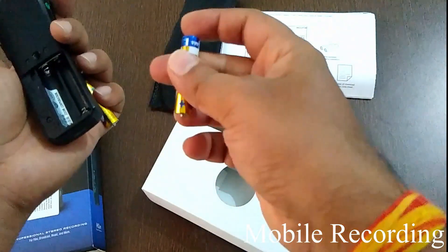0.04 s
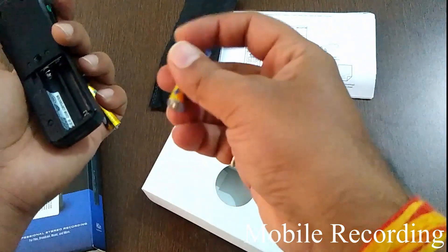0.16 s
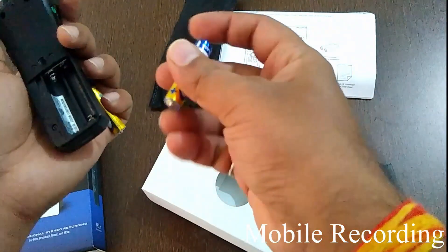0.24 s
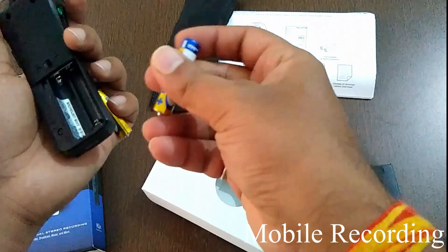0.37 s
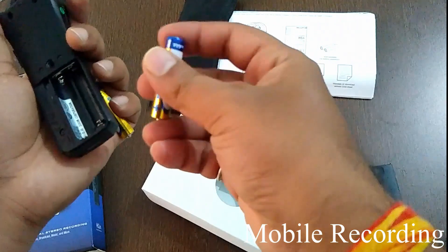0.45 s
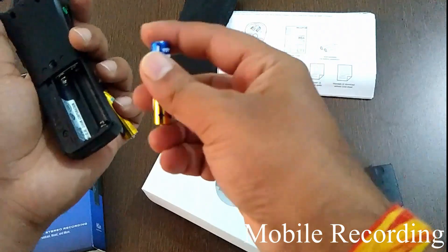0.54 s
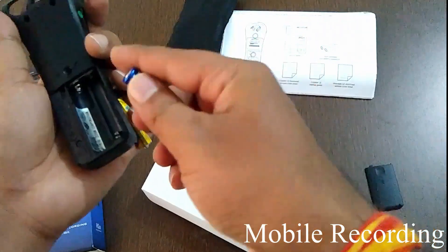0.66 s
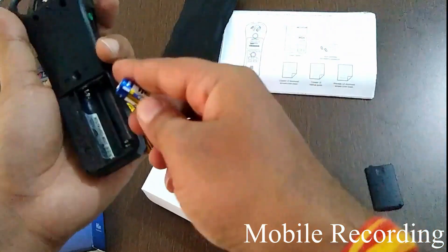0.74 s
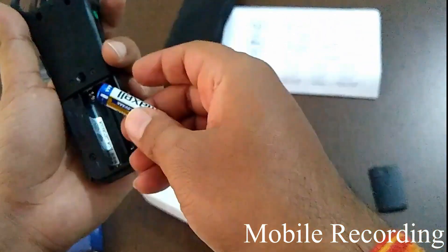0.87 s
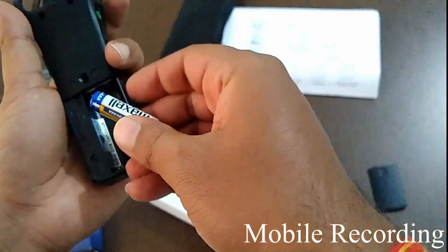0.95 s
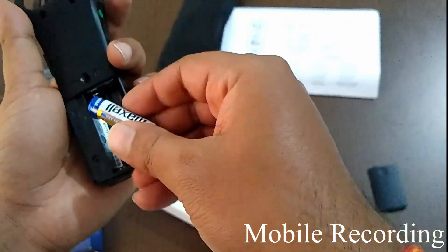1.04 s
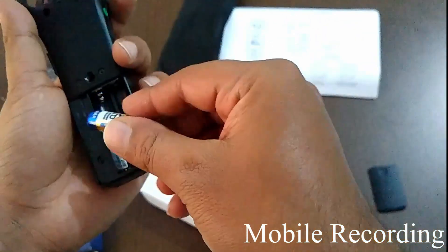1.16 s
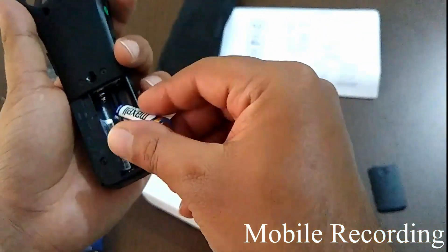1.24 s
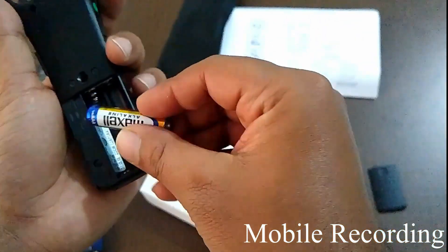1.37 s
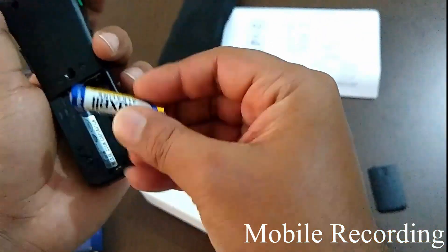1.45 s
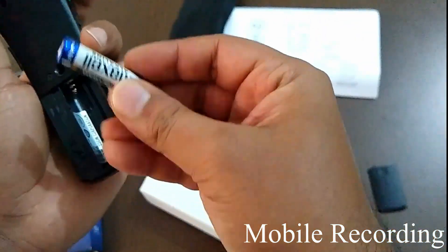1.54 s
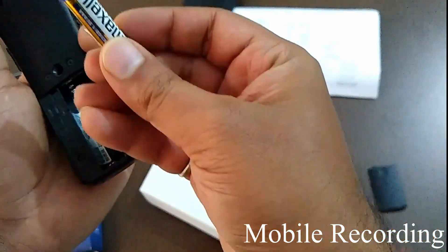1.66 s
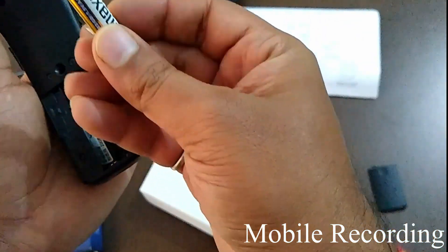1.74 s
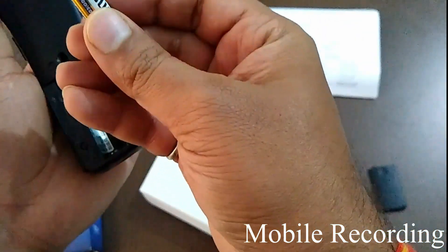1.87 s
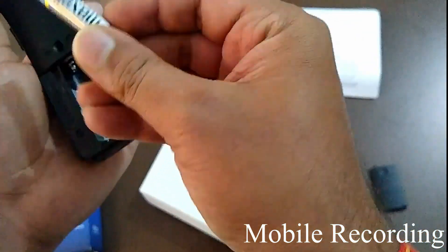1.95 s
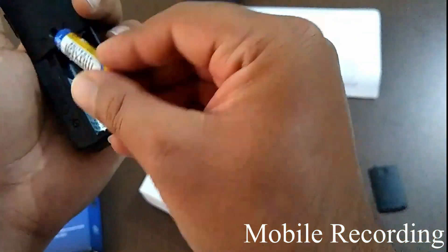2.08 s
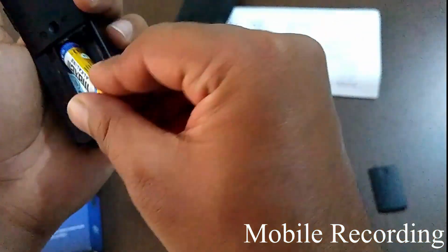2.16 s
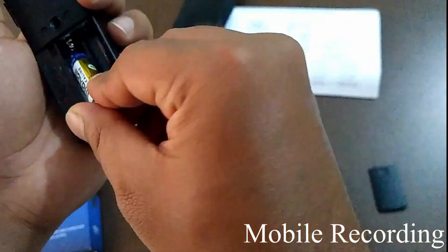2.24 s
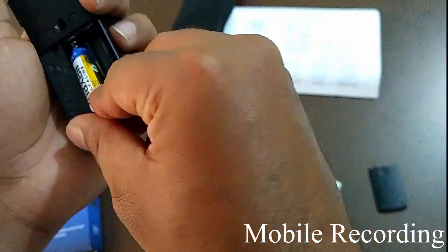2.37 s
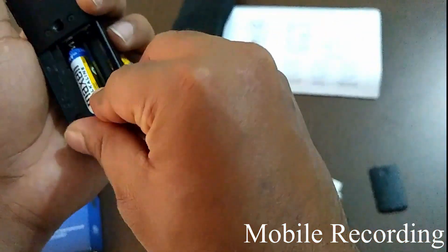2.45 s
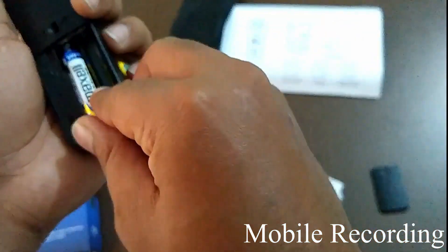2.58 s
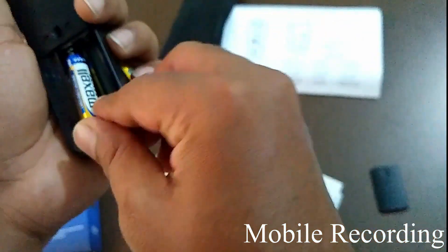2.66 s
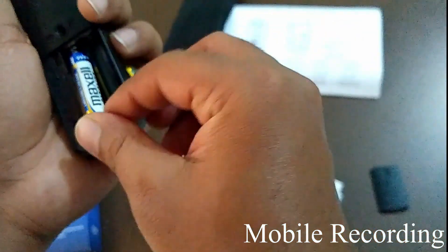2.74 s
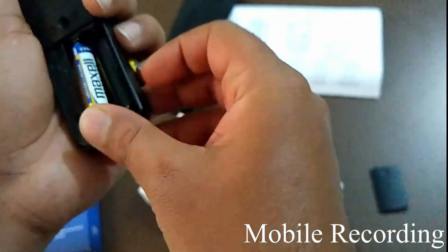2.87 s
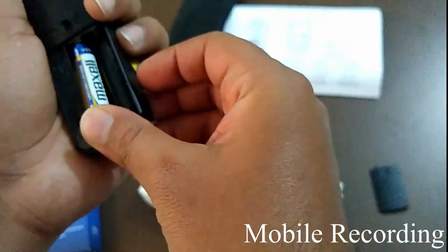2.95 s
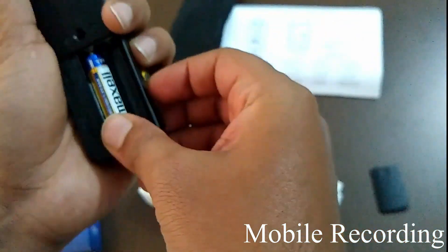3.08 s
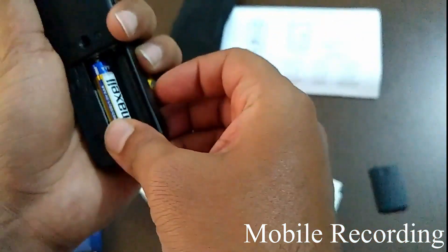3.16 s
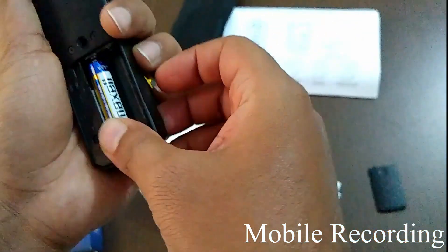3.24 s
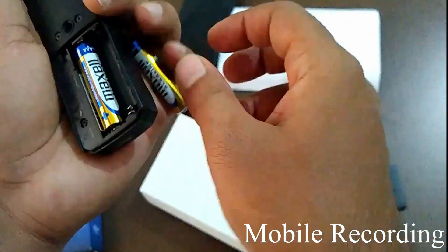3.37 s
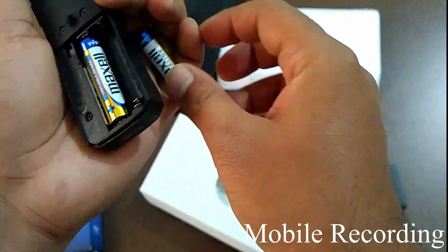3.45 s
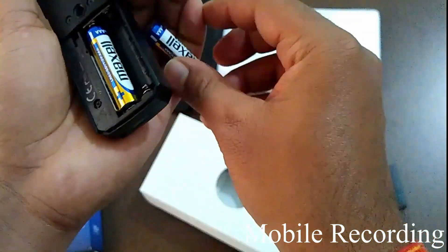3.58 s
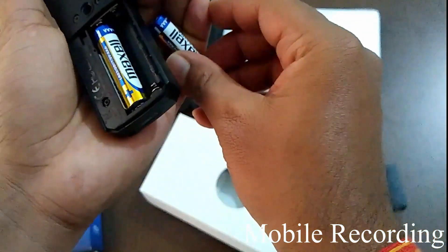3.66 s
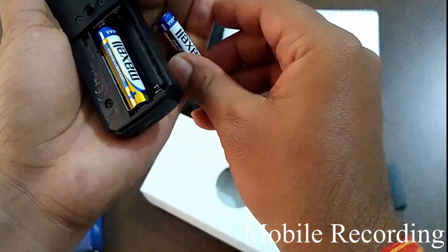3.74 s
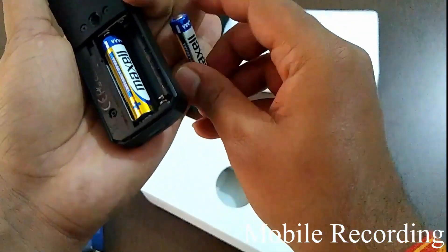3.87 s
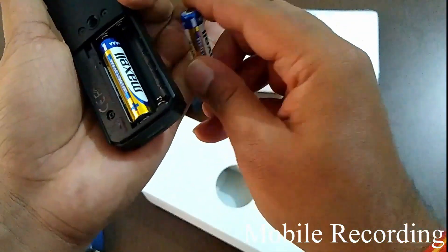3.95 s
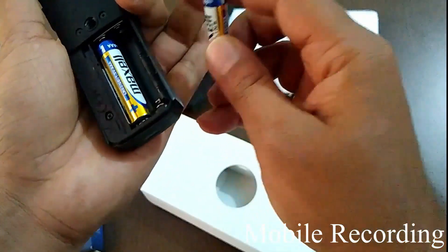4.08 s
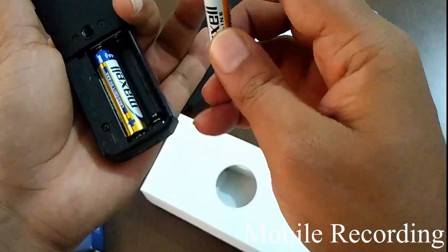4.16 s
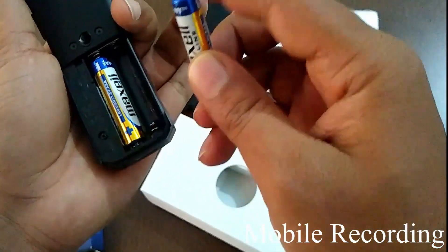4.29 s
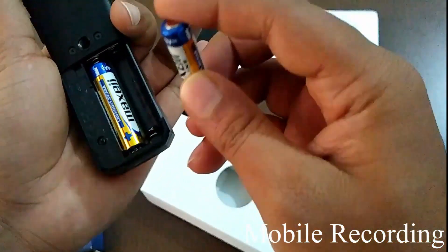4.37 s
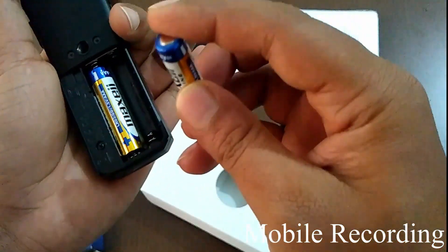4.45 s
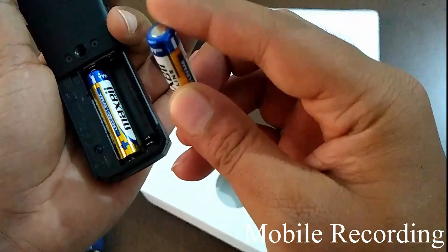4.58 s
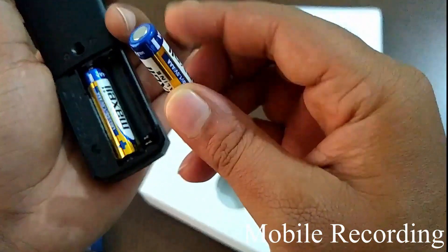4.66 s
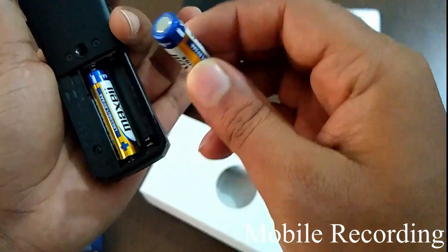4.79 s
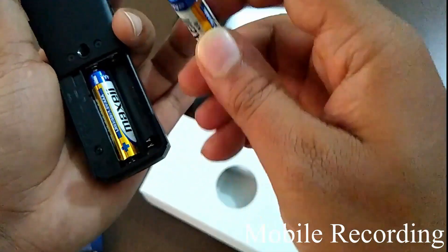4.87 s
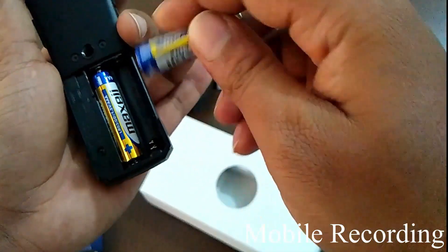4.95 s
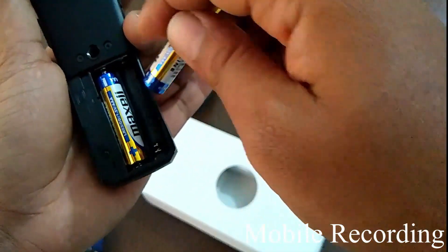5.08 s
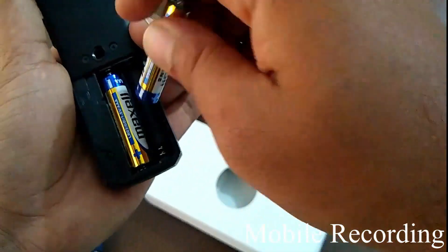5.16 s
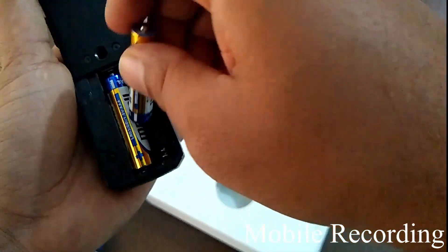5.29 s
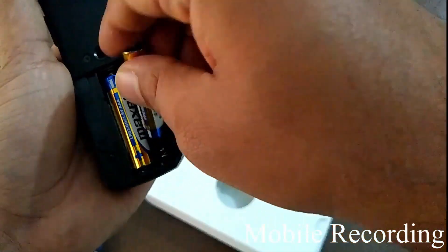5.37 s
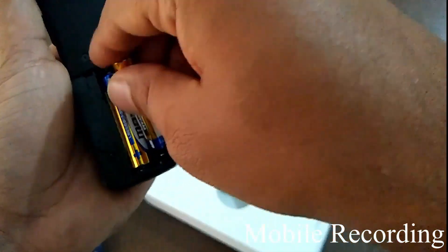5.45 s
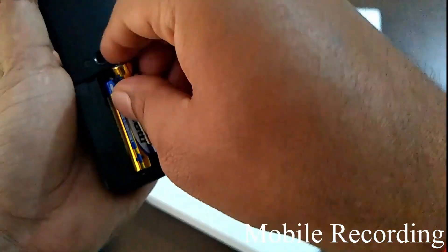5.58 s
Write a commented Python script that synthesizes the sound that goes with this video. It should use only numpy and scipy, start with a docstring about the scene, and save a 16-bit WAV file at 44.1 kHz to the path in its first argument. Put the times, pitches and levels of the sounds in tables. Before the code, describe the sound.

A fan runs throughout in a bare room, a quiet low rush and hum with faint hiss, slowly rising and falling a little. Close by, a small battery is fitted into the plastic compartment of a hand-held device. A very faint tick and scrape come at about 0.8 seconds. The battery taps the rim sharply at 1.3 seconds and again, louder, at 2.3, each time with a tiny bounce. Lighter ticks and soft scrapes along the spring follow from 2.4 to 2.8. At 2.9 it snaps home with the loudest click, followed by a quick rattle of clicks around 3.0 and a faint tick at 3.3. Then there is little but the fan until 5.3 to 5.5 seconds, when a second battery knocks against the compartment with a few softer clicks and a short scrape. The clicks are brief, bright and plastic, each leaving a slight room echo.

```python
"""A bare room, with the steady rush and hum of a fan; the background level slowly rises and falls.
Close by, small batteries go into the plastic bay of a hand-held device: one cell taps the rim,
scrapes along the spring and snaps home, then a second is set against the bay.
Every knock and scrape rings the modes of the plastic shell, and the room rings after it."""
import sys
import numpy as np
from scipy import signal
from scipy.fft import rfft, irfft
from scipy.io import wavfile

SR = 44100
rng = np.random.default_rng(int(sys.argv[2]) if len(sys.argv) > 2 else 0)


def wav_record(signal):
    """Record a signal, one row per channel, as 16-bit PCM in the file named by sys.argv[1]."""
    frames = np.transpose(np.atleast_2d(signal))
    bounded = np.clip(frames, -1, 1)
    # unit amplitude maps onto the largest positive 16-bit level
    quanta = np.round(bounded * 32767).astype(np.int16)
    wavfile.write(sys.argv[1], SR, quanta)


N = 247842


def gain_of(db):
    """Decibels to amplitude."""
    return 10 ** (np.asarray(db) / 20)


def unit_rms(x):
    """Scales to rms 1."""
    return x / np.sqrt(np.mean(x ** 2) + 1e-20)


def eq_gain(points, hz):
    """Gain of an EQ curve drawn in dB on a log-frequency axis."""
    point_hz, db = np.transpose(points)
    return gain_of(np.interp(np.log(hz + 1), np.log(point_hz + 1), db))


def automation(points):
    """Straight ramps between timed points, one value a sample."""
    return np.interp(np.arange(N) / SR, *np.transpose(points))


def add(mix, start_s, sound):
    """Mixes a sound in at its start time."""
    part = mix[round(start_s * SR):][:len(sound)]
    part += sound[:len(part)]


def noise(spectrum):
    """Steady noise of the given colour, rms 1."""
    white = rfft(rng.standard_normal(N))
    return unit_rms(irfft(white * eq_gain(spectrum, np.fft.rfftfreq(N, 1 / SR)), N))


def background_swell(level_db, share):
    """Gain around level_db that follows a share of the slow rise and fall of the background level."""
    # background level, taken relative to its mean: time_s, level_db
    swell = [(0.0, -49.5), (0.72, -49.5), (0.94, -48.5), (1.34, -48), (1.6, -45.5), (2.05, -46),
             (2.35, -48.5), (2.6, -48), (3.01, -45), (4.43, -45), (4.59, -46), (5.34, -49.5), (5.62, -44)]
    swell_db = automation(swell)
    return gain_of(level_db + share * (swell_db - swell_db.mean()))


def fan_rush(split_hz=600):
    """Moving air: a low rush with a faint hiss above it, both riding the background level."""
    # colour of the rushing air: frequency_hz, relative_db
    rush_spectrum = [(20, -54), (60, -20), (95, -18), (125, -8.5), (190, -3), (310, -0.5), (345, 1),
                     (420, 0.5), (480, -0.5), (720, -9), (1050, -5), (1500, -14), (2200, -32.5),
                     (3000, -70)]
    # colour of the hiss: frequency_hz, relative_db
    hiss_spectrum = [(1200, -7.5), (2300, -5), (2800, 3.5), (3600, -1.5), (4500, -16.5), (5200, -9.5),
                     (5900, -12.5), (6800, -23), (7700, -18), (8900, -25), (10000, -21), (15400, -25.5),
                     (16000, -33)]
    air = noise(rush_spectrum)
    body = signal.sosfiltfilt(signal.butter(4, split_hz, fs=SR, output="sos"), air)
    return (background_swell(level_db=-49, share=1.11) * unit_rms(body)
            + background_swell(level_db=-51, share=0.97) * unit_rms(air - body)
            + background_swell(level_db=-66, share=0.75) * noise(hiss_spectrum))


def fan_hum(waver_hz=3, waver_depth=0.92):
    """Low fan tones that waver in level and phase and ride the background level."""
    # tones of the fan: pitch_hz, level_db
    tones = [(121.4, -63.5), (182.4, -61.5), (201.3, -59.5), (243, -60), (399, -61.5), (427, -56.5),
             (444, -70)]
    t = np.arange(N) / SR
    slow_band = np.exp(-(np.fft.fftfreq(N, 1 / SR) / waver_hz) ** 2)
    out = np.zeros(N)
    for pitch_hz, level_db in tones:
        jitter = rng.standard_normal(N) + 1j * rng.standard_normal(N)
        drift = np.fft.ifft(np.fft.fft(jitter) * slow_band)
        carrier = np.exp(2j * np.pi * (pitch_hz * t + rng.random()))
        tone = ((1 + waver_depth * drift / drift.std()) * carrier).real
        out += background_swell(level_db, share=0.68) * unit_rms(tone)
    return out


def shell_ring(place, bass_db, treble_db, pitch, ring, pivot_hz=3200, spread_db=1.46, samples=1400):
    """One blow on the shell, peak 1: broad contacts stir the low modes, sharp edges the high ones."""
    # modes of the plastic shell with a cell in it: pitch_hz, floor_hit_db, rim_hit_db, t60_s
    shell_modes = [(846, -8, -22, 0.011), (1440, -0.5, -11.5, 0.006), (1673, -3, -3, 0.014),
                   (2027, -15, -5, 0.012), (2957, -0.5, 2, 0.0046), (3440, 2, 6, 0.0061),
                   (3800, -4, -2.5, 0.004), (5204, -17.5, -16.5, 0.0082), (5984, -23, -15.5, 0.0081),
                   (7600, -26, -18.5, 0.0041), (9180, -29, -38, 0.0039), (10980, -34.5, -22, 0.0029),
                   (13800, -35, -35, .003)]
    build_s, chatter_s, low_cut_hz = 0.00027, 0.0034, 620
    hz, floor_db, rim_db, t60_s = np.transpose(shell_modes)[:, :, None]
    t = np.arange(samples) / SR
    # place runs from 0 on the bay's floor to 1 on its rim
    mode_db = floor_db + place * (rim_db - floor_db) + spread_db * rng.standard_normal(hz.shape)
    # tilts are per octave from the pivot; the bass tilt levels off one octave down
    octaves = np.log2(hz / pivot_hz)
    mode_db += bass_db * np.clip(-octaves, 0, 1) + treble_db * np.maximum(octaves, 0)
    # the modes build up as the blow spreads through the shell; neighbours move in opposite senses
    envelope = (1 - np.exp(-t / build_s)) * np.exp(-np.log(1000) * t / (t60_s * ring))
    polarity = (-1) ** np.arange(len(hz))[:, None]
    modes = (polarity * gain_of(mode_db) * envelope * np.sin(2 * np.pi * pitch * hz * t)).sum(0)
    # the contact chatters for a moment after the first touch
    force = 0.0455 * rng.standard_normal(samples) * np.exp(-t / chatter_s)
    force[0] = 1
    sound = signal.fftconvolve(modes, force)[:samples]
    # so small a body radiates no bass
    sound = signal.lfilter(*signal.butter(2, low_cut_hz, "high", fs=SR), sound)
    return sound / abs(signal.hilbert(sound)).max()


def cell_scrapes(slips_per_s=1500, uneven_db=4):
    """A sliding cell makes a train of tiny uneven slips, each ringing the shell."""
    # strokes along plastic or spring: start_s, end_s, level_db, place (0 floor, 1 rim), pitch_ratio
    strokes = [(0.744, 0.896, -60.5, 0.21, 1.05), (0.796, 0.884, -56.5, 0.63, 0.79),
               (2.498, 2.55, -58, .95, 1.08), (2.583, 2.648, -58, .9, 1.05),
               (2.718, 2.78, -61.5, 0.39, 1.05), (2.773, 2.81, -53.5, 0.17, 1.05),
               (3.287, 3.295, -53.5, 0.27, 1.06), (5.409, 5.435, -50, 0.73, 0.98),
               (5.44, 5.497, -58.5, 0.53, 1.08)]
    out = np.zeros(N)
    slips = (rng.random(N) < slips_per_s / SR) * rng.choice([-1, 1], N)
    slips = slips * gain_of(uneven_db * np.minimum(rng.exponential(1, N), 3))
    for start_s, end_s, level_db, place, pitch in strokes:
        stroke = slips[round(start_s * SR):][:round((end_s - start_s) * SR)]
        stroke = stroke * signal.windows.tukey(len(stroke), 0.5)
        # broad and hissy on the floor, narrow on the rim
        bass_db = np.interp(place, [0, 1], [8.5, -17])
        treble_db = np.interp(place, [0, 1], [16.5, -21])
        shell = shell_ring(place, bass_db, treble_db, pitch, ring=0.4)
        add(out, start_s, gain_of(level_db) * unit_rms(signal.fftconvolve(stroke, shell)))
    return out


def cell_clicks(restitution=0.63, settled_s=0.0032, first_bounce_db=-8, next_bounce_db=-6):
    """Cells knock on the rim or snap into the bay; loose ones bounce ever faster until they settle."""
    # hits on the bay: start_s, peak_db, place (0 floor, 1 rim), bass_db_per_octave,
    # treble_db_per_octave, pitch_ratio, ring_ratio, bounce_gap_s (0 if held firmly)
    hits = [ (0.7484, -39.5, 0.8, 1, 8, 1, 0.95, 0.005),
            (1.2614, -10.5, 1, -19.5, -4.5, 0.962, 0.93, .0111), (1.3063, -29.5, .9, -7, -4, 1.06, 1.06, 0),
            (2.2786, -7, 0.78, -3, -1, 1.008, 1.1, 0.01), (2.4363, -31, .9, -9, 3, 1.03, 1.5, 0.0075),
            (2.454, -19, 0.26, 8, 0, 0.99, 1.8, 0), (2.6342, -35, 0.4, 0, 3, 0.97, 1.8, 0),
            (2.89, -33, .28, 4, 12.5, 0.9, 1.5, 0.0059), (2.8974, -34, .2, 9, 9, 1.08, 1.1, 0.01),
            (2.9162, -3.5, .08, 6.5, 4, 0.99, .8, 0), (2.9968, -15, .3, 1, 2.5, .97, 0.93, 0.0051),
            (3.0175, -10, .12, 5, 6, 1.032, 1.4, 0.0013), (3.0251, -22, .05, 4, 4, 0.96, 0.92, 0.0011),
            (3.0326, -24, .22, -6, 3, 1.07, 1.2, 0), (3.0385, -21, .17, 15, 6, .99, 1.9, 0),
            (3.0486, -16, 0.12, -5, -4, 1.08, 0.82, .0035), (3.2887, -32.5, 0.41, -1, 8.5, 0.98, .8, 0),
            (3.9324, -38.5, 0.3, 6, 8, 1.04, .64, 0.0055), (5.3389, -17.5, .02, 5, -2, 0.97, 0.39, 0.0033),
            (5.4135, -27, 0.36, -7, 3.5, 0.99, 1.3, 0.0059), (5.4197, -25.5, .05, 3, 6.5, 0.9, 1, 0),
            (5.4802, -40, 0.36, -10, 13, 0.99, 1.2, 0)]
    out = np.zeros(N)
    for start_s, peak_db, place, bass_db, treble_db, pitch, ring, gap_s in hits:
        add(out, start_s, gain_of(peak_db) * shell_ring(place, bass_db, treble_db, pitch, ring))
        peak_db += first_bounce_db
        while gap_s > settled_s:
            start_s += gap_s
            # the loose cell sounds duller and rings longer
            bounce = shell_ring(place, bass_db + 8, treble_db - 1, pitch, ring * 1.46)
            add(out, start_s, gain_of(peak_db) * bounce)
            peak_db += next_bounce_db
            gap_s *= restitution
    return out


def room(x, early_db=-21, early_s=0.01, tail_db=-15, t60_s=0.66, damping_hz=16000, predelay_s=0.005):
    """Quick reflections off the table and hands, then the diffuse tail of the walls."""
    # colour of the room's tail: frequency_hz, relative_db
    tail_colour = [(450, -6), (1050, -20), (1550, -5.5), (2100, -1.5), (2830, 4.5), (3450, -6.5),
                   (4400, -0.5), (5600, -3), (8100, 2), (14000, 1.5)]
    # extra reverb send while the hands are still turned away: time_s, boost_db
    send = [(.8, 5.5), (1.29, 2), (2.29, 0.5)]
    t = np.arange(SR) / SR
    fade_in = np.clip(t / predelay_s - 1, 0, 1)
    hz, frame_s, bands = signal.stft(rng.standard_normal(SR), SR, nperseg=256)
    # air and soft surfaces swallow the treble sooner
    decay_per_s = np.log(1000) / t60_s * (1 + (hz / damping_hz) ** 2)
    bands = bands * np.exp(-np.outer(decay_per_s, frame_s)) * eq_gain(tail_colour, hz)[:, None]
    tail = signal.istft(bands, SR, nperseg=256)[1][:SR] * fade_in
    early = rng.standard_normal(SR) * np.exp(-t / early_s) * fade_in
    response = gain_of(early_db) * early / np.linalg.norm(early)
    response += gain_of(tail_db) * tail / np.linalg.norm(tail)
    return signal.fftconvolve(x * gain_of(automation(send)), response)[:N]


def scene():
    """Battery handling and its reverb over the fan, in mono."""
    handling = cell_clicks() + cell_scrapes()
    return (handling + room(handling) + fan_rush() + fan_hum())[None]


def record(dry):
    """A steep low-pass trims the very top of the treble."""
    low_pass = signal.firwin(511, cutoff=15900, window=("kaiser", 9), fs=SR)
    return signal.oaconvolve(dry, low_pass[None], "same")


dry = scene()
out = record(dry)
wav_record(out)
```